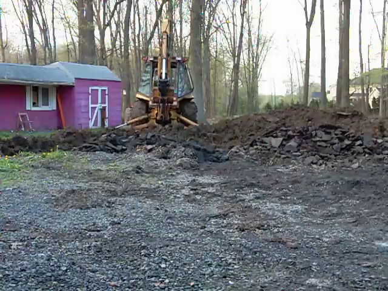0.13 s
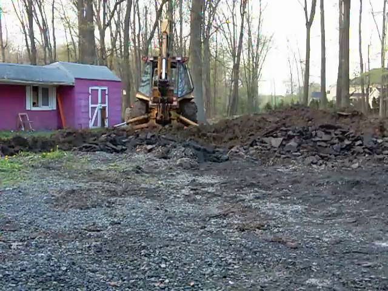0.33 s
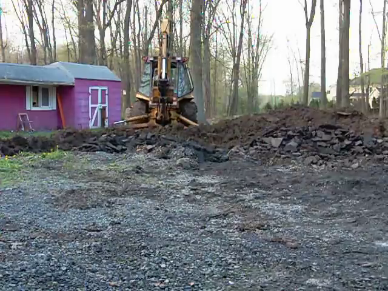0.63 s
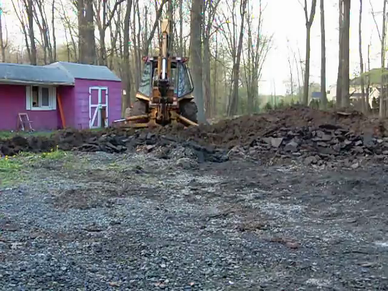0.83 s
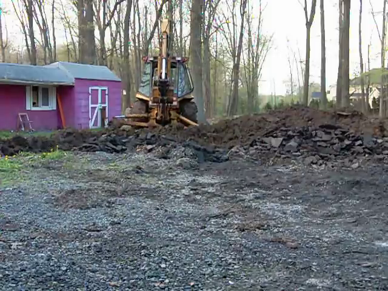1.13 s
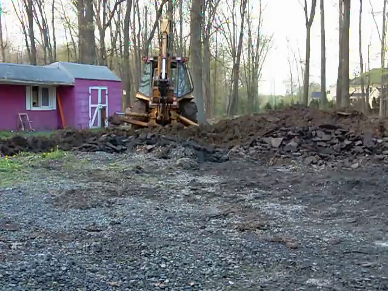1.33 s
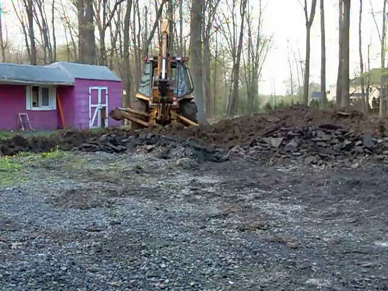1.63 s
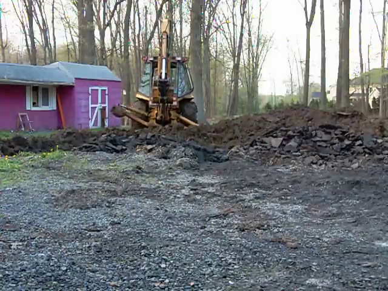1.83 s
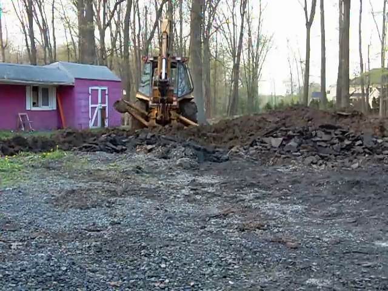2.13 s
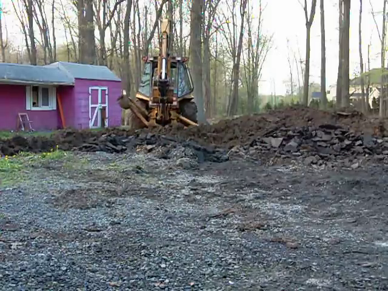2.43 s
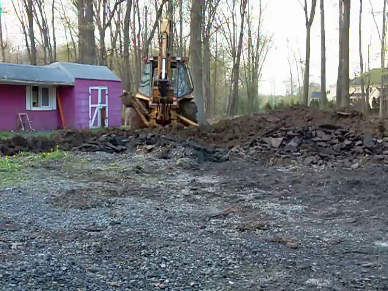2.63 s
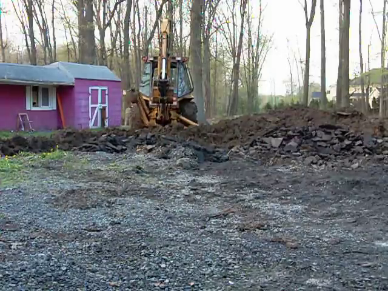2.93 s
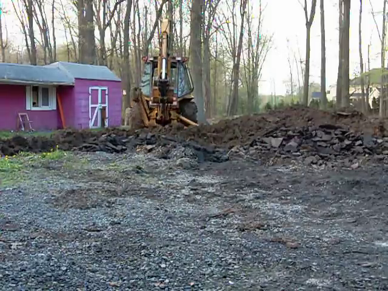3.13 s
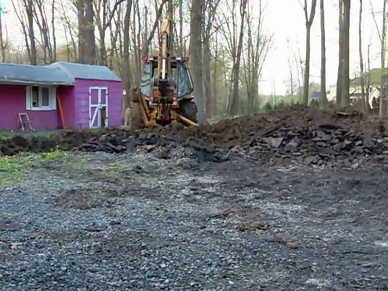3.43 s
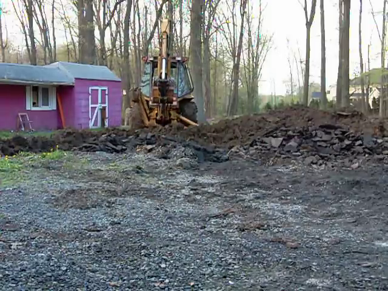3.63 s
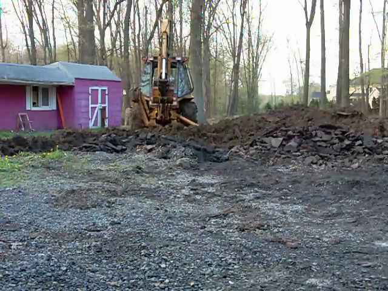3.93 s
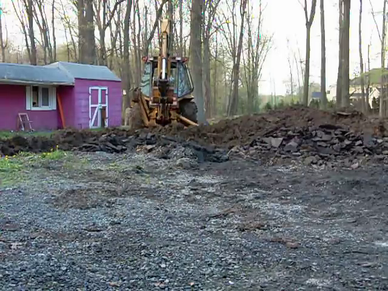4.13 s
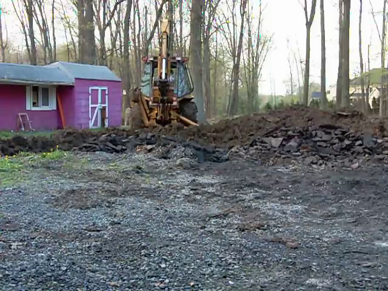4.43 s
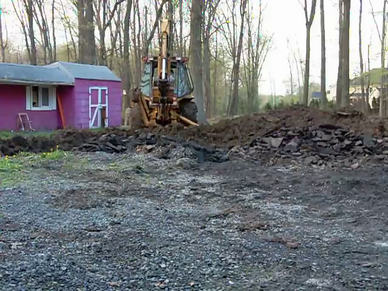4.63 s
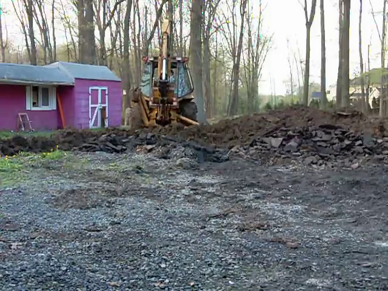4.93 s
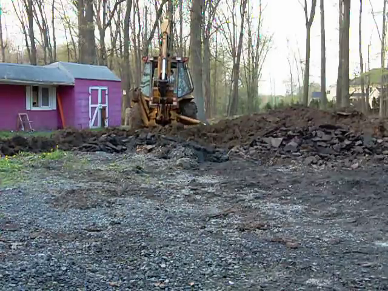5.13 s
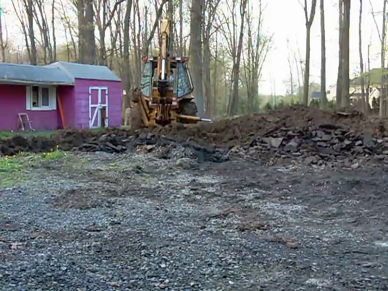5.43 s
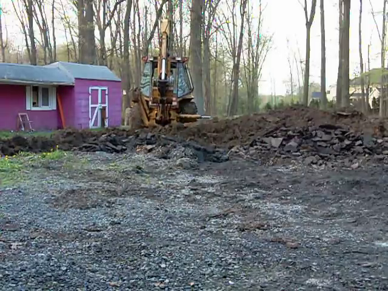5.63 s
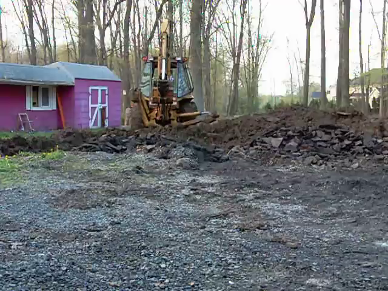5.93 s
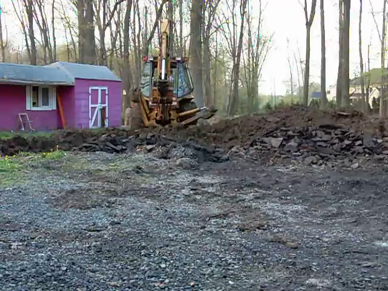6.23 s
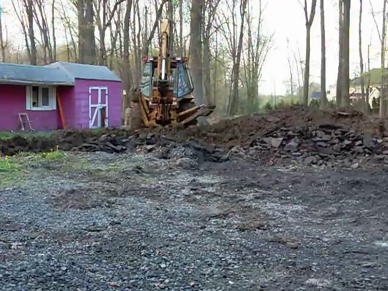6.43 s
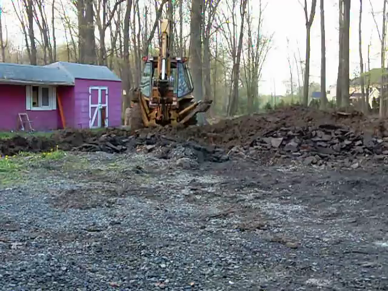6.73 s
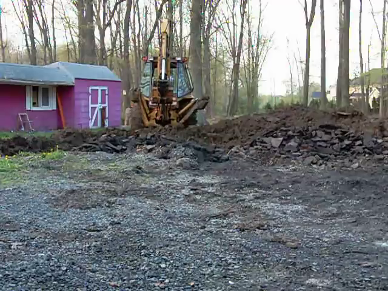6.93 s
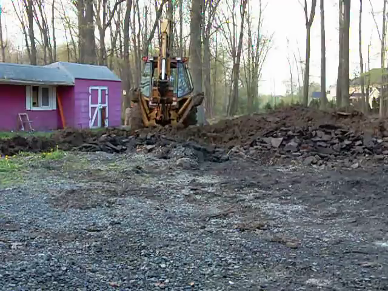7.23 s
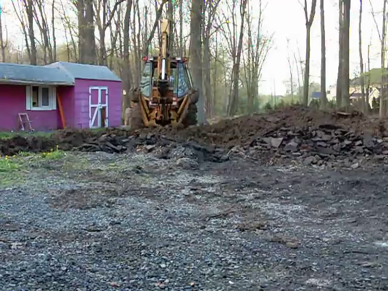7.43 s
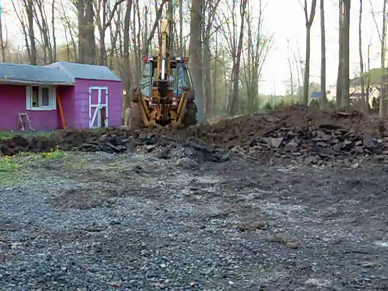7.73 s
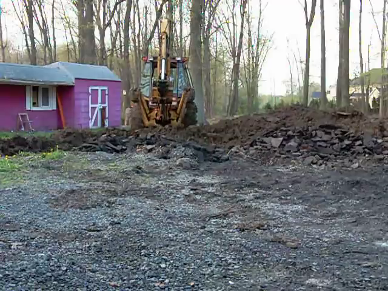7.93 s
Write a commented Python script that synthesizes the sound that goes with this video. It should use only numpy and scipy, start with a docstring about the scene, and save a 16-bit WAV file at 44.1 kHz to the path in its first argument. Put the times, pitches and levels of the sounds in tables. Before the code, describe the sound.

Outdoors, a four-cylinder digger engine lugs in slow chugs, revs up quickly, then growls and wavers with clatter, hydraulic hiss and two dull clanks.

```python
"""A four-cylinder diesel digger works some way off across open ground.
It first lugs in separate chugs that ring a silencer, over combustion clatter and broad engine roar.
At about 0.9 s it picks up: tones locked to a firing count give the exhaust note, which follows load,
and the crank, fan and pump tones; valve hiss (filtered noise) comes and goes.
Late on, at 5.8 and 7.8 s, noisy contacts ring steel in two knocks."""
import sys
import numpy as np
from scipy import signal
from scipy.fft import rfft, irfft, next_fast_len
from scipy.io import wavfile

SR = 44100
rng = np.random.default_rng(int(sys.argv[2]) if len(sys.argv) > 2 else 0)


def digitize_waveform(pressure):
    """Quantize a signal to 16-bit integers and store it at the path in sys.argv[1].

    Rows of a 2-D input are taken as channels; values are limited to [-1, 1].
    """
    field = np.atleast_2d(pressure).T
    bounded = np.clip(field, -1, 1)
    quanta = np.round(bounded * 32767).astype(np.int16)
    wavfile.write(sys.argv[1], SR, quanta)


def gain_from_decibels(decibels):
    """Convert decibel values to linear amplitude factors."""
    exponent = np.asarray(decibels, float) / 20
    return 10 ** exponent


N = 356107

# engine speed once it picks up: (time [s], rate [firings/s])
SPEED_PER_S = [(.88, 24.4), (1.2, 44.4), (1.3, 47.6), (1.52, 54.2), (1.76, 60), (2.2, 68.5), (2.3, 65.4),
               (2.42, 56.5), (2.6, 53.1), (2.82, 51), (3.14, 50.8), (3.3, 55.2), (4.32, 54.8), (4.46, 55.7),
               (4.84, 61.4), (4.96, 53), (5.04, 50.5), (5.19, 51.7), (5.38, 57), (5.79, 61.4), (5.9, 59.9),
               (6.23, 64.3), (6.5, 69.9), (6.62, 70.2), (6.95, 67.2), (7.51, 58.3), (7.65, 58.2),
               (7.89, 59.1), (8.07, 64.3)]
# fuel burnt, above or below the usual: (time [s], load [dB])
LOAD_DB = [(0, 11), (.1, 3.5), (.27, -1), (.4, 7.5), (.55, 2.5), (.78, 0.5), (.92, 9.5), (1.17, 10),
           (1.55, 5), (1.9, 0.5), (2.2, 2.5), (2.5, -3.5), (2.8, -3), (3.27, -1), (3.37, -7), (4.32, -1.5),
           (4.46, 0.5), (4.75, 0.5), (5.05, 1), (5.19, 3.5), (5.38, 3), (5.7, 0.5), (6.3, 0.86),
           (7.23, -1.65), (7.6, 0), (7.9, 0.5)]
# the governor briefly cuts the fuel: (middle [s], half length [s], depth [dB])
FUEL_CUTS = [(2.318, 0.13, 15), (4.925, .1, 10.5), (5.515, 0.046, 5.5), (5.863, 0.072, 9), (8.07, 0.17, 9)]
# the pipe favours some pitches; tone levels at usual load:
# (rate [firings/s], note [dB], octave [dB], third [dB], fourth [dB], pump tone [dB])
TONES_BY_SPEED_DB = [(23.8, -42.5, -27.5, -36, -54, -43), (30.4, -41.5, -24.5, -50, -45, -54.5),
                     (41.7, -34, -37.5, -53, -50, -58), (42, -35.5, -45, -50, -46, -58),
                     (49, -33, -29.5, -77, -51, -54), (51, -29.5, -38, -56.5, -53.5, -58.5),
                     (54.4, -29.5, -36.5, -57, -64, -55.5), (57.4, -27.5, -38, -63.5, -55, -56.5),
                     (61.9, -28, -38, -50.5, -57.5, -57.5), (65.5, -30, -50.5, -46, -64, -77),
                     (66.55, -29.5, -51, -55.5, -68, -64), (70.3, -35, -64, -53, -80, -52)]
OCTAVE_FOLLOWS, THIRD_FOLLOWS, PUMP_FOLLOWS = 0.33, 0.28, 0.48   # share of the load's swing in dB

# exhaust strength of each cylinder: (level [dB])
CYLINDERS_DB = [0.31, -1.3, -0.75, -0.32]
# chugs while lugging: (time [s], peak [dB])
CHUGS = [(.007, -21), (0.055, -23), (.106, -43), (0.146, -37), (0.205, -38), (0.243, -46), (0.283, -29.5),
         (0.344, -24), (.397, -23), (0.441, -21.5), (0.482, -28), (0.537, -37), (0.58, -30), (0.63, -30),
         (.687, -28), (0.74, -29.5), (0.797, -27), (0.848, -23)]
# silencer resonances rung by a chug: (frequency [Hz], width per pass [Hz], relative level [dB])
SILENCER_MODES = [(53, 31, 4.5), (102.2, 26, -6.5), (186, 55, -21)]
# upper pipe resonances: (frequency [Hz], width per pass [Hz], relative level [dB])
PIPE_MODES = [(210.8, 58, -1.5), (276.3, 32, -4.5), (335.8, 41, -8)]

# combustion knock of each cylinder: (relative level [dB])
KNOCKING_DB = [-5, 2, 4, 1]
# engine block resonances: (frequency [Hz], width [Hz], relative level [dB])
BLOCK_MODES = [(1400, 400, -5), (1800, 300, -7), (2330, 220, 1), (5400, 400, -10)]
# colour of the clatter's hiss: (frequency [Hz], relative density [dB per Hz])
CLATTER_COLOUR = [(600, -11.5), (800, -11.5), (1100, -8.5), (1350, -4.5), (1900, -4.5), (2350, -6.5),
                  (2800, -10), (3700, -9.5), (4900, -9), (6000, -11.5), (7500, -12.5), (7900, -16.5),
                  (8600, -5.5), (9300, -27.5)]
# rattling firings: (time [s], relative strength [dB])
HARD_FIRINGS = [(0.062, -34), (0.349, -28), (0.4, -38), (0.4457, -27.5), (0.8955, -29), (0.932, -26.5),
                (0.9674, -33), (1.0344, -52), (1.5696, -31.5)]
# upper bands of the hiss against the rest, taken about the mean: (time [s], level [dB])
TREBLE_DB = [(0, -5.5), (.3, -6.5), (.8, -5.5), (1, -2), (2.4, -3), (2.9, -3), (3.45, -5.5), (4.8, -5),
             (5, -3.5), (7.6, -2.5), (8.07, -7)]
CLATTER_DB, CLATTER_FOLLOWS = -51, 0.67   # hiss at usual load; share of the load's swing
KNOCK_DB, TAPPET_DB = -8, -13.5   # against the hiss
CLATTER_CUT, CLATTER_CUT_MOST_DB = 0.8, 5   # share of a fuel cut, and its limit
TREBLE_KEEPS = 0.75   # share of that dip which spares the treble

# crank tone at half the firing rate: (time [s], level [dB])
CRANK_DB = [(.88, -58), (2.1, -56.5), (3.1, -61), (4.4, -60), (4.85, -49), (5.4, -60), (5.9, -51),
            (6.6, -56), (7.5, -48)]
# fan tone: (multiple of firing rate, level [dB])
FAN = (3.25, -53)
# pump whine overtones: (multiple of firing rate, level against WHINE_DB [dB])
WHINE_OVERTONES = [(10, 2), (15, 0)]
# the whine swells while a lever is held: (start [s], end [s], swell [dB])
WHINE_HELD = (6.3, 7.3, 4.7)
WHINE_DB = -74

# oil hissing through a valve: (start [s], end [s], frequency [Hz], width per pass [Hz], level [dB])
VALVES = [(.9, 2.2, 4900, 300, -62), (4.85, 5.5, 6300, 200, -62), (5.95, 7.6, 4500, 900, -61),
          (6.7, 7.6, 6450, 300, -66)]
# steel on steel: (time [s], relative strength [dB])
KNOCKS = [(5.804, -39.5), (7.7575, -33.5)]
# steel member's modes: (frequency [Hz], relative level [dB], t60 [s])
STEEL_MODES = [(1680, 2, .035), (1350, -3, .03), (1050, -5, .03), (2300, -6, .012), (3000, -4, .01),
               (4500, -9, .006), (6300, -12, .005)]

# colour of the roar: (frequency [Hz], relative density [dB per Hz])
ROAR_COLOUR = [(18, -26), (30, -10.5), (49, -8), (70, -19), (118, -11.5), (197, -14), (377, -26),
               (518, -25), (711, -37), (1100, -38.5), (1430, -58), (2420, -120)]
# level of the low roar: (time [s], level [dB])
ROAR_LEVEL_DB = [(0, -43), (.27, -48.5), (.45, -43.5), (.75, -47.5), (1.17, -39), (1.55, -45.5), (2.1, -49),
                 (2.6, -52), (3.2, -49.5), (3.5, -52), (4.3, -47.5), (4.9, -43), (5.4, -50.5), (6.5, -49.5),
                 (7, -47), (8.07, -51)]
ROAR_SURGE_DB = 1.5   # spread of random surges


def in_time(rows):
    """Columns of a table, interpolated at every sample."""
    s, *columns = np.transpose(rows)
    return [np.interp(np.arange(N) / SR, s, column) for column in columns]


def rms_one(x):
    """Scales to rms 1."""
    return x / np.sqrt(np.mean(x ** 2) + 1e-20)


def drift(rate_hz):
    """Slow random wander of spread 1: low-passed noise, drawn every 40 samples."""
    r = np.exp(-80 * np.pi * rate_hz / SR)
    noise = rng.standard_normal(N // 40 + 2002)
    slow = signal.lfilter([1], [1, -2 * r, r * r], noise)[2000:]   # skip the filter's start
    return np.interp(np.arange(N) / 40, np.arange(len(slow)), rms_one(slow))


def resonate(x, hz, width_hz):
    """One two-pole resonance, gain 1 on top."""
    r = np.exp(-np.pi * width_hz / SR)
    zeros = np.array([1, 0, -1]) * (1 - r * r) / 2
    poles = [1, -2 * r * np.cos(2 * np.pi * hz / SR), r * r]
    return signal.lfilter(zeros, poles, x + 1e-18)


def resonate_twice(x, hz, width_hz):
    """Two passes: the ring swells before it dies, and the skirts are steeper."""
    return resonate(resonate(x, hz, width_hz), hz, width_hz)


def body(x, modes):
    """Resonances in parallel, signs alternating."""
    return sum((-1) ** k * gain_from_decibels(db) * resonate(x, hz, width_hz)
               for k, (hz, width_hz, db) in enumerate(modes))


def chambers(x, modes):
    """Double resonances in parallel, all of one sign."""
    return sum(gain_from_decibels(db) * resonate_twice(x, hz, width_hz) for hz, width_hz, db in modes)


def fade(x, seconds):
    """Every click leaves an exponential tail."""
    return signal.lfilter([1], [1, -np.exp(-1 / (seconds * SR))], x + 1e-18)


def clicks(rows):
    """Single-sample pulses from rows of time and dB."""
    s, db = np.transpose(rows)
    out = np.zeros(N)
    out[np.clip(s * SR, 0, N - 1).astype(int)] = gain_from_decibels(db)
    return out


def banded_noise(colour, flicker_db, above_db=0, split_hz=0):
    """Coloured noise in third-octave bands that flicker apart; those above the split follow above_db."""
    hz, db = np.transpose(colour)
    size = next_fast_len(N)
    bins_hz = np.arange(size // 2 + 1) * SR / size + 1
    gain = gain_from_decibels(np.interp(np.log(bins_hz), np.log(hz), db, left=-200, right=-200))
    coloured = rfft(rng.standard_normal(size)) * gain
    out = 0
    edges_hz = 16 * 2 ** np.arange(0, 9.4, 1 / 3)
    for low, high in zip(edges_hz, edges_hz[1:]):
        if hz[0] < high and low < hz[-1]:
            band = irfft(coloured * (bins_hz >= low) * (bins_hz < high), size)[:N]
            out = out + band * gain_from_decibels(flicker_db * drift(16) + above_db * (low > split_hz))
    return rms_one(out)


def engine_state():
    """Load, fuel cuts, and the level of each engine tone that follows from them and the speed."""
    s = np.arange(N) / SR
    per_s, = in_time(SPEED_PER_S)
    load_db, = in_time(LOAD_DB)
    cut_db = -sum(depth_db * np.clip(1 - np.abs(s - middle) / half, 0, 1)
                  for middle, half, depth_db in FUEL_CUTS)
    rate, *levels = np.transpose(TONES_BY_SPEED_DB)
    shares = [1, OCTAVE_FOLLOWS, THIRD_FOLLOWS, THIRD_FOLLOWS, PUMP_FOLLOWS]
    tones_db = [np.interp(per_s, rate, db) + share * (load_db + cut_db)
                for db, share in zip(levels, shares)]
    return load_db, cut_db, tones_db


def crank():
    """Firings counted up since the engine picked up, and a switch that is 1 from then on."""
    per_s, = in_time(SPEED_PER_S)
    running = np.clip((np.arange(N) / SR - SPEED_PER_S[0][0]) / 0.02 + 0.5, 0, 1)
    return np.cumsum(per_s * (running > 0)) / SR + 0.23, running


def exhaust(count, running, note_db, octave_db):
    """The note and its octave are clean; unequal cylinders make it throb once per four firings."""
    per_s, = in_time(SPEED_PER_S)
    turn = 2 * np.pi * count
    cycle_db = CYLINDERS_DB + CYLINDERS_DB[:1]
    pattern = gain_from_decibels(np.interp(count % 4, np.arange(5), cycle_db))
    # light running gives a saw-like pulse; load and speed flatten its top
    lead_rad = np.minimum(1.7 + 0.27 * (note_db + 34), 3.4) + 0.12 * np.maximum(per_s - 58, 0)
    note = gain_from_decibels(note_db + 0.72 * drift(7.6)) * np.cos(turn) * pattern
    octave = gain_from_decibels(octave_db + 1.3 * drift(15)) * np.cos(2 * turn + lead_rad) * pattern ** 2.1
    return np.sqrt(2) * running * (note + octave)


def chugs():
    """Slow single firings: a puff passes two chambers, so the ring swells for a cycle, then dies."""
    unit = np.zeros(SR // 10)
    unit[0] = 1
    unit_peak = np.max(np.abs(chambers(unit, SILENCER_MODES)))
    puffs = clicks([(max(s - 0.009, 0), db) for s, db in CHUGS])   # early, as the ring takes time to swell
    return -chambers(puffs, SILENCER_MODES) / unit_peak


def pipe(fired, roar_db):
    """Each firing's sharp front rings the upper pipe resonances, twice over for dark valleys."""
    fronts = fired * gain_from_decibels(0.23 * rng.standard_normal(N))
    return gain_from_decibels(roar_db - 12) * rms_one(chambers(fronts, PIPE_MODES))


def clatter(count, fired, clatter_db, bright_db):
    """Steady mechanical hiss, a noise burst through the block at every firing, a loose tappet every fourth."""
    hiss = banded_noise(CLATTER_COLOUR, flicker_db=0.56, above_db=bright_db - np.mean(bright_db),
                        split_hz=2400)
    strength = gain_from_decibels(np.array(KNOCKING_DB)[count.astype(int) % 4] + 0.54 * rng.standard_normal(N))
    blast = fade(fade(fired * strength, 0.004), 0.001) * rng.standard_normal(N)
    knock = rms_one(body(blast, BLOCK_MODES))
    every_fourth = fired * (count % 4 < 1) * gain_from_decibels(2.5 * rng.standard_normal(N))
    tap = fade(every_fourth, 0.007) * rng.standard_normal(N)
    tappet = rms_one(resonate(tap, hz=2303, width_hz=170))
    burst = fade(fade(clicks(HARD_FIRINGS), 0.0092), 0.00072) * rng.standard_normal(N)
    rattles = body(burst, BLOCK_MODES) + gain_from_decibels(2) * resonate(burst, hz=2266, width_hz=130)
    steady = hiss + gain_from_decibels(KNOCK_DB) * knock + gain_from_decibels(TAPPET_DB) * tappet
    return gain_from_decibels(clatter_db) * steady + gain_from_decibels(-30) * rattles


def tones(count, running, third_db, fourth_db, pump_db):
    """Crank, fan and gear pump turn in step with the engine; five pump teeth pass per firing."""
    s = np.arange(N) / SR
    start, end, swell_db = WHINE_HELD
    whine_db = WHINE_DB + swell_db * np.clip(np.minimum(s - start, end - s) / 0.084, 0, 1)
    turn = 2 * np.pi * count
    fan_multiple, fan_db = FAN
    shaft = gain_from_decibels(in_time(CRANK_DB)[0]) * np.sin(turn / 2)
    fan = gain_from_decibels(fan_db + 1.2 * drift(2)) * np.sin(fan_multiple * turn)
    third = gain_from_decibels(third_db + 1.5 * drift(8)) * np.sin(3 * turn)
    fourth = gain_from_decibels(fourth_db + 1.5 * drift(8)) * np.sin(4 * turn)
    pump = gain_from_decibels(pump_db + 1.5 * drift(8)) * np.sin(5 * turn)
    whine = sum(gain_from_decibels(whine_db + db + 2.8 * drift(12)) * np.sin(k * turn) for k, db in WHINE_OVERTONES)
    return np.sqrt(2) * running * (shaft + fan + third + fourth + pump + whine)


def knocks():
    """A short noisy contact rings a steel member."""
    contact = fade(fade(clicks(KNOCKS), 0.005), 0.0026) * rng.standard_normal(N)
    # t60 to bandwidth
    modes = [(hz, np.log(1000) / (np.pi * t60_s), db) for hz, db, t60_s in STEEL_MODES]
    return gain_from_decibels(-26.5) * body(contact, modes) + gain_from_decibels(-51.5) * contact


def valves():
    """Narrow bands of hiss that swell and fade while a lever is held."""
    s = np.arange(N) / SR
    out = 0
    for start, end, hz, width_hz, db in VALVES:
        held = np.clip(np.minimum(s - start, end - s) / 0.16, 0, 1)
        hiss = rms_one(resonate_twice(rng.standard_normal(N), hz, width_hz))
        out = out + gain_from_decibels(db + drift(9.9)) * held * hiss
    return out


def roar(roar_db):
    """Broad exhaust and intake noise; its upper part rises and falls less than its bass."""
    upper_db = -0.3 * (roar_db - np.mean(roar_db))
    return gain_from_decibels(roar_db) * banded_noise(ROAR_COLOUR, flicker_db=0, above_db=upper_db, split_hz=290)


def ground(x):
    """Adds a few dull echoes from the shed and the trees."""
    dull = signal.sosfilt(signal.butter(1, 3000, fs=SR, output="sos"), x)
    echoes = [(0.021, -12.5), (0.047, -7.5), (0.09, -10)]   # (delay [s], level [dB])
    return x + sum(gain_from_decibels(db) * np.pad(dull, (int(s * SR), 0))[:N] for s, db in echoes)


def scene():
    """Load and speed drive the exhaust note, clatter and most tones; chugs and roar have their own levels."""
    load_db, cut_db, (note_db, octave_db, *weaker_db) = engine_state()
    dip_db = np.maximum(CLATTER_CUT * cut_db, -CLATTER_CUT_MOST_DB)
    clatter_db = CLATTER_DB + CLATTER_FOLLOWS * load_db + dip_db
    bright_db = in_time(TREBLE_DB)[0] - TREBLE_KEEPS * dip_db
    roar_db = in_time(ROAR_LEVEL_DB)[0] + ROAR_SURGE_DB * drift(3.7)
    count, running = crank()
    fired = np.diff(np.floor(count - 0.12), prepend=0)   # the knock trails the exhaust pulse
    low = exhaust(count, running, note_db, octave_db) + chugs() + pipe(fired, roar_db)
    low = low + tones(count, running, *weaker_db) + roar(roar_db)
    high = clatter(count, fired, clatter_db, bright_db) + knocks() + valves()
    return (low + ground(high))[None]   # only clatter, knocks and valves get echoes


def band_limit(x):
    """A steep low-pass at the top of the band."""
    return signal.sosfilt(signal.butter(12, 8850, fs=SR, output="sos"), x)


def record(dry):
    """The recorder cuts the top: 60 dB down from 9.3 kHz up."""
    dull = signal.sosfilt(signal.cheby2(10, 60, 9300, fs=SR, output="sos"), dry)
    return band_limit(dull)


dry = scene()
out = record(dry)
digitize_waveform(out)
```